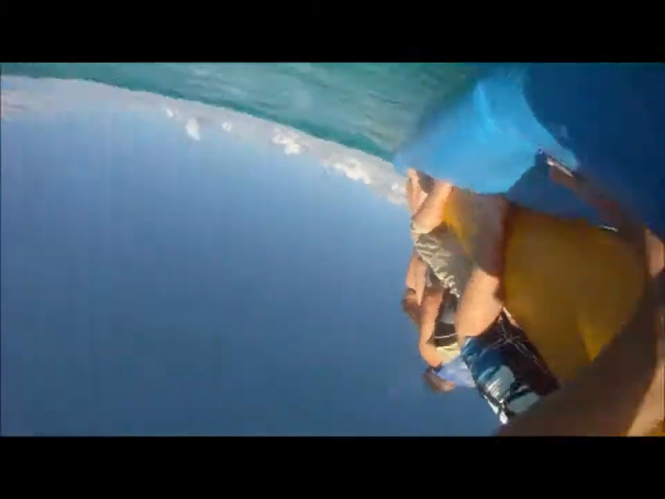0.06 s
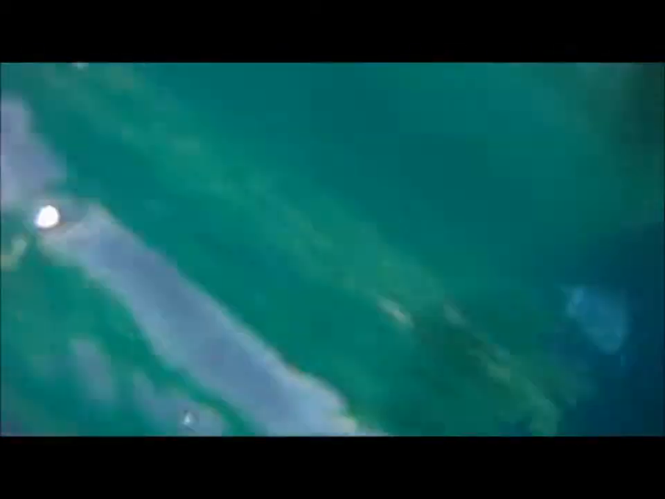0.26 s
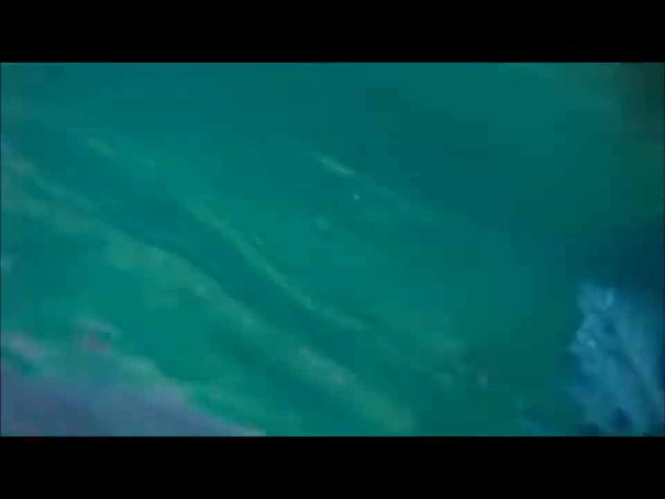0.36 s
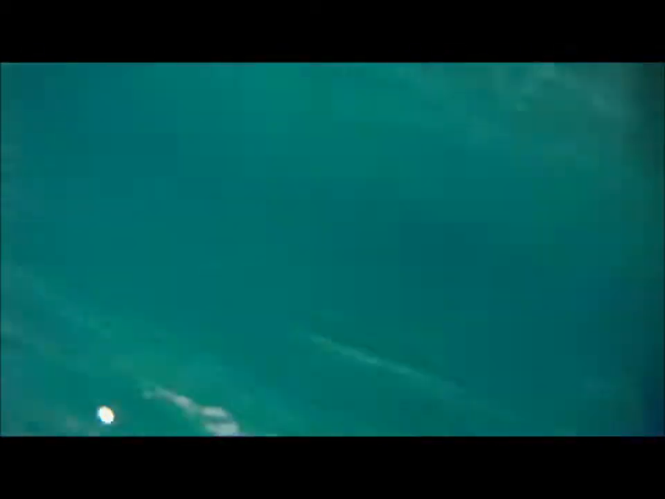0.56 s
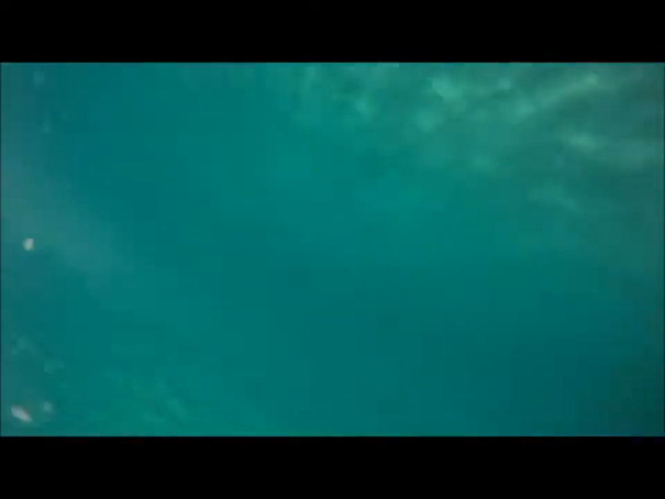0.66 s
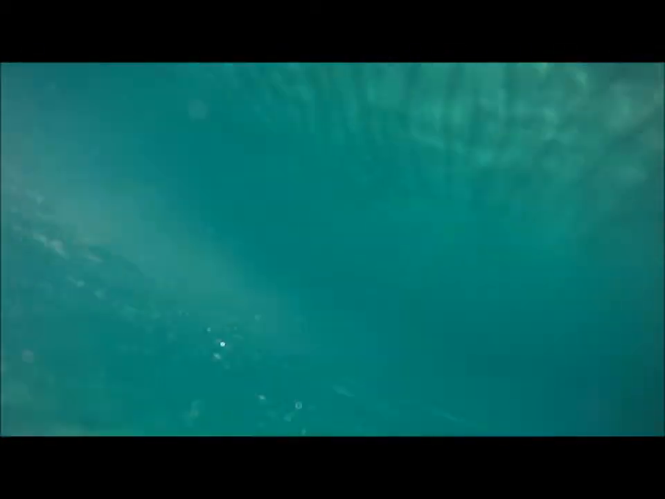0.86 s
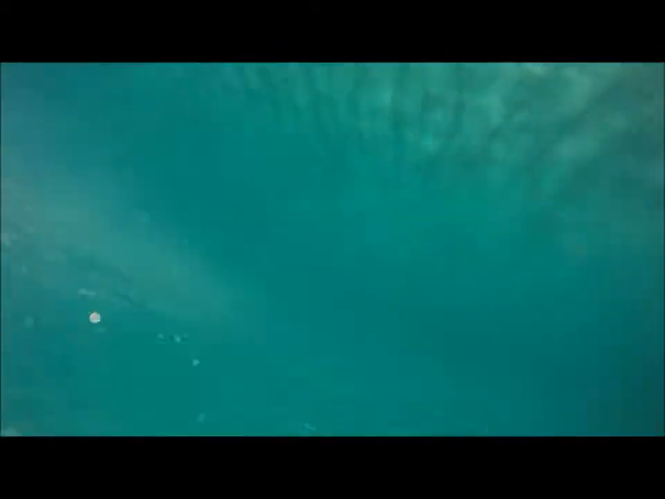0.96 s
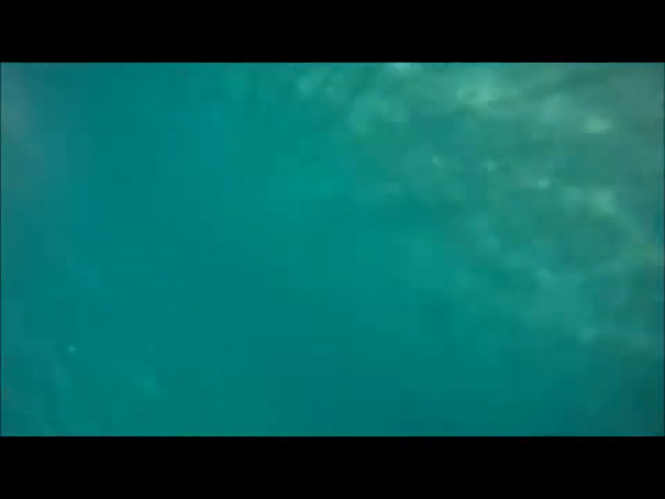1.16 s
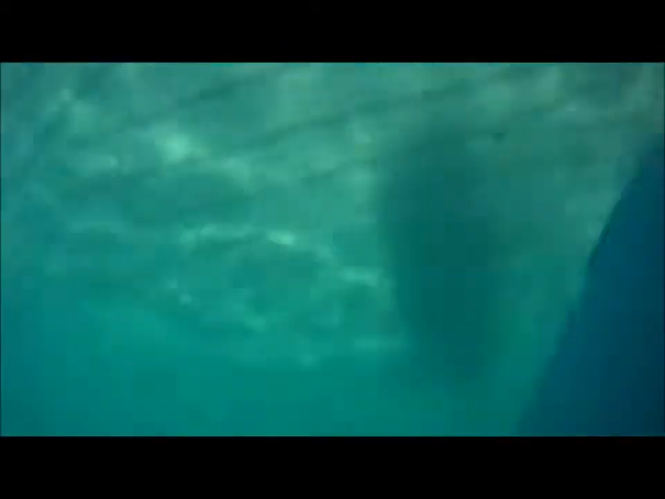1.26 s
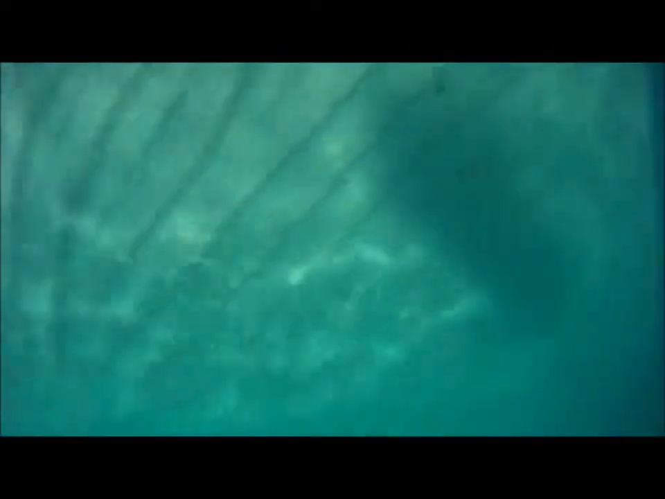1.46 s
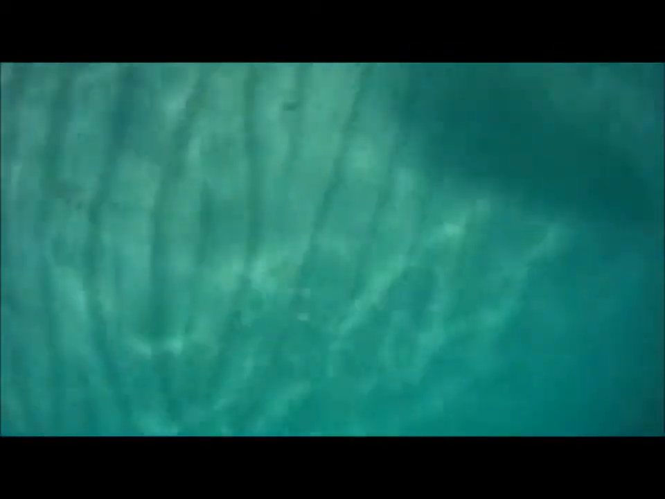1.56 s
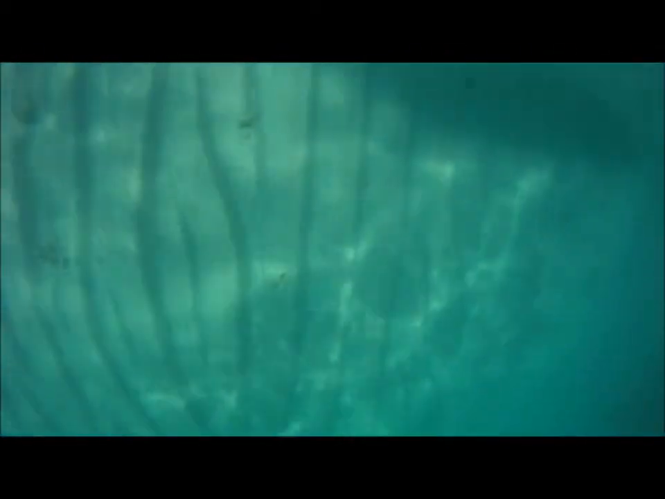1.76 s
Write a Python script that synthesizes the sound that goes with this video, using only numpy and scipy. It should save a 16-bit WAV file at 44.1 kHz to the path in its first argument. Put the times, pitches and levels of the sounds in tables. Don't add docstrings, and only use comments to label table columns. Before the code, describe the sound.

Water slaps and bubbles against a plastic camera housing going under, in a rapid cluster, then separate hard thuds and blips, fading gurgles and small drips over faint hiss; very close, coarse, briefly overloaded underwater microphone.

```python
import sys
import numpy as np
from scipy import signal
from scipy.fft import rfft, irfft, next_fast_len
from scipy.io import wavfile
from scipy.ndimage import uniform_filter1d, map_coordinates

SR = 44100
rng = np.random.default_rng(int(sys.argv[2]) if len(sys.argv) > 2 else 0)


def undo_db(level):
    steps = np.asarray(level, float) / 20
    return 10 ** steps


def wav_out(sig):
    wavfile.write(sys.argv[1], SR, np.round(np.clip(np.atleast_2d(sig).T, -1, 1) * 32767).astype(np.int16))


N = 79380

# f/Hz, level/dB (per Hz)
STILL_SPECTRUM = [(250, 0), (800, -12.5), (2200, -22), (5900, -27)]
# t/s (deepest point), depth/full scale, build-up/ms
PUSHES = [(0.032, 0.08, 14.2), (0.129, .045, 8.6), (.227, 0.017, 1.6), (0.234, 0.35, 0.97),
          (0.299, 0.035, 0.84), (0.3568, -0.079, 0.83), (0.5697, 0.047, 1.7), (0.6953, -0.42, 0.9),
          (0.7043, 0.1, 5), (0.7742, 1, 0.89), (0.8494, -0.34, 1.04), (0.8914, .06, 9.8),
          (1.041, -0.13, 3.1), (1.0555, 0.55, 1.35), (1.109, 0.28, 0.67), (1.156, 0.16, 7.2),
          (1.1687, 0.16, 7), (1.1783, 0.16, 5.5), (1.205, -0.067, 2.6), (1.2743, 0.12, 3.6),
          (1.298, 0.46, 2.8), (1.358, 0.87, 2.6), (1.476, 0.13, 1.6), (1.486, -0.15, 5.6),
          (1.519, 0.33, 0.36), (1.5873, .05, 0.47), (1.635, -0.029, 4.2)]
# t/s, level/dB
SWAY = [
    (0, -41),
    (.6, -39.5),
    (.9, -31),
    (1.3, -36.5),
    (1.6, -28.5),
    (1.8, -47),
]
# start t/s, end t/s, start level/dB, end level/dB
SURGES = [(0, .055, -37.5, -56), (.5, .55, -46, -45.5), (.04, .205, -72, -30.5), (.36, .4, -35, -37.5),
          (.24, .33, -35.5, -35.5), (.4, .445, -40, -25.5), (.46, .508, -38, -27.5), (.54, .6, -46, -47),
          (.63, .69, -39.5, -33), (.69, .706, -17, -6), (.705, .718, -24.5, -36.5), (.72, .77, -49, -55.5),
          (.85, .884, -36, -48.5), (.886, .955, -50.5, -31.5), (.955, .978, -39, -46.5),
          (.975, 1.05, -61, -50.5), (1.126, 1.209, -38.5, -39.5), (1.21, 1.265, -59.5, -58),
          (1.292, 1.4, -39, -59), (1.455, 1.475, -55, -46), (1.51, 1.65, -32.5, -56)]
# f/Hz, width/Hz, level/dB
FOAM_PEAKS = [(880, 334, 4), (2086, 460, 3.5), (3760, 650, -7), (5300, 620, -17)]
# start t/s, end t/s, level/dB, f/Hz
SEEPS = [
    (0.051, 0.14, -48.5, 3720),
    (0.1, 0.067, -51, 4500),
    (0.0587, 0.087, -48.5, 3040),
    (0.086, 0.14, -54.5, 4900),
    (0.094, 0.18, -56.5, 5500),
]
# start t/s, end t/s, start level/dB, end level/dB
SPRAY = [
    (.206, .228, -21.5, -20),
    (.805, .85, -44, -36),
    (1.265, 1.292, -52, -42.5),
    (1.475, 1.51, -37.5, -51.5),
]
# t/s, peak level/dB, f/Hz, fade time/ms (down
# about 130 dB), pitch glide/half the shift as a share of f per fade time
GLIDING_POCKETS = [(.2275, -25, 1275, 8, -0.47), (.234, -19, 3690, 20, -0.43), (.239, -12, 2055, 40, -.1),
                   (.251, -21, 3540, 12, -0.097), (.2575, -21.5, 3770, 12, -0.24), (.279, -22, 750, 43, -0.025),
                   (.2855, -20, 3380, 20, -0.19), (.2905, -16, 750, 11.4, 0.62), (.3075, -15, 1465, 36, -0.57),
                   (.314, -22, 1014, 44, 0.084), (.7732, -3, 1140, 8.2, 0.15), (.851, -37, 795, 72, -0.023),
                   (1.0537, -7, 880, 17.7, 0.11), (1.054, -26, 3680, 10, 0.31), (1.058, -19, 1310, 6.7, -0.19),
                   (.468, -21, 3550, 12, -0.063), (1.077, -28, 3200, 22, 0.13), (1.0775, -27.5, 2150, 17, .05),
                   (1.083, -41, 1300, 34, -0.11), (1.1078, -12.5, 750, 7.1, 0.68), (1.1115, -24, 770, 44, -0.059),
                   (1.3765, -34.5, 604, 14, .01), (1.134, -25, 1800, 22, 0.032), (1.4265, -22.5, 2200, 22, -0.0011),
                   (1.4385, -15, 2030, 25.4, 0.011), (1.489, -23, 2020, 16, -0.067), (1.4605, -28, 3740, 6.8, .01),
                   (1.461, -26.5, 800, 21, -0.18), (1.467, -30.5, 880, 28, 0.014), (1.472, -25, 403, 15, -0.22),
                   (1.645, -36, 2310, 30, -0.12), (1.648, -31.5, 3600, 10, -0.083), (1.657, -40, 1900, 45, 0.16),
                   (1.652, -43.5, 757, 40, -0.3), (1.733, -26.5, 1550, 14, -0.022), (1.734, -38, 1022, 85, 1.05),
                   (1.7415, -37.5, 3630, 15, .01), (1.7415, -34, 2300, 14, -0.24), (1.776, -45, 780, 32, -0.14)]
# t/s, peak level/dB, t60/ms, brightness level/dB
SLAPS = [(0.2278, 8, 14.7, 7.5), (0.238, -6, 35, -20), (0.275, -17, 42, -1), (0.298, -11.5, 21, 12.5),
         (0.308, -13, 22, 12.5), (0.3548, 6.5, 15.5, 8), (0.3907, -12, 11, 8.5), (.429, -11.5, 27, -8.5),
         (0.4433, -8.5, 46, 7.5), (0.4498, -5, 12, 28), (0.459, -5.5, 9.3, 14), (.5505, -14, 19, 21),
         (.563, -16, 39, 12.5), (0.5693, -13.5, 15, 15), (0.5987, -10.5, 43, 12), (0.6304, -11, 15, 14.5),
         (0.7015, 5, 7.3, 13.5), (0.7736, 1.5, 11.2, -9), (0.8475, -16, 31, 1.5), (1.0533, -4.5, 24.3, -22),
         (1.1075, -9, 25, -14), (1.127, -20.5, 40, -6.5), (1.2947, -26, 22, 16), (1.331, -24, 27, 6.5),
         (1.348, -10, 14.3, -4), (1.4265, -23, 6, 22.5)]
# t/s, peak level/dB, t60/ms
TAPS = [(0.341, -26.5, 57), (1.076, -29, 24), (1.179, -27, 36), (1.46, -25.5, 54), (1.528, -15, 16),
        (1.596, -29.5, 18), (1.648, -29.5, 25), (1.691, -41.5, 25), (1.7325, -27.5, 12), (1.742, -35, 18),
        (1.775, -37, 14)]
# f/Hz, width/Hz, level/dB
HOUSING_PEAKS = [(925, 570, 1.5), (1900, 720, 7), (3687, 283, -3.5), (5050, 500, -17.5)]
# t/s, peak level/dB, f/Hz, fade time/ms (down about 130 dB)
POCKETS = [(.2285, 0, 2307, 11), (0.2379, -5.5, 986, 23), (0.2778, -10.5, 2250, 22),
           (0.286, -12.5, 1830, 36), (0.3115, -12.5, 952, 31), (0.3555, -3, 1565, 17.5),
           (.3655, -16.5, 810, 49), (0.3902, 1, 1904, 15.5), (0.4503, 1.5, 1666, 17),
           (0.4575, -3.5, 2214, 14.4), (0.5165, -21.5, 551, 73), (.551, -13.5, 3720, 14),
           (0.57, -18, 1900, 15), (0.5992, -10, 2310, 23), (.6, -18.5, 750, 35), (.68, -17.5, 662, 137),
           (.7005, 1, 3590, 22), (.7015, -10.5, 1756, 15), (.552, -25, 2170, 22), (1.0535, -14, 638, 40),
           (1.3445, -12, 1314, 38.4), (.733, -31.5, 708, 170), (1.053, -3, 1900, 10.5),
           (1.076, -21.5, 1320, 25), (1.11, -16, 1840, 21), (1.345, -21.5, 694, 49), (1.348, -5, 2180, 30),
           (1.455, -13.5, 2020, 15.4), (1.643, -31, 1460, 77), (1.7331, -34, 1157, 18)]
# start t/s, end t/s, start level/dB, end level/dB
GURGLES = [
    (.255, .34, -42, -39),
    (.849, .875, -28, -39),
    (1.295, 1.31, -19, -70),
    (.886, .982, -30, -38.5),
    (1.452, 1.476, -40, -38),
    (1.5, 1.66, -35.5, -53.5),
]


def unit(x):
    return x / np.sqrt(np.mean(x ** 2) + 1e-20)


def wobble(rate):
    knots = rng.standard_normal(int(N * rate / SR) + 4)
    return map_coordinates(knots, [np.arange(N) * rate / SR])


def filtered(x, response):
    m = next_fast_len(N + SR // 2)
    return irfft(rfft(x, m) * response(np.fft.rfftfreq(m, 1 / SR)), m)[..., :N]


def resonances(rows, bright_db=0):
    def response(f):
        total = 0
        for k, (centre, width, db) in enumerate(rows):
            damping = 1j * f * width
            peak = damping / (centre * centre - f * f + damping)
            total = total + (-1) ** k * undo_db(db + bright_db * (k > 1)) * peak
        return total
    return response


def spans(rows):
    edge_ms = 3
    t = np.arange(N) / SR
    gain = np.zeros(N)
    for start, end, start_db, end_db in rows:
        opening = np.clip((t - start) * 1000 / edge_ms + .5, 0, 1)
        closing = np.clip((end - t) * 1000 / edge_ms + .5, 0, 1)
        gain += undo_db(np.interp(t, [start, end], [start_db, end_db])) * opening * closing
    return gain


def bump(ms, rise, fall):
    return np.exp(-(ms / np.where(ms < 0, rise, fall)) ** 2)


def churn(response):
    grains_per_s, grain_spread_db, grain_share = 2500, 2, .5
    patchy_db, flutter_db = 2.5, 2
    struck = rng.random(N) < grains_per_s / SR
    clicks = struck * rng.standard_normal(N) * undo_db(grain_spread_db * rng.exponential(size=N))
    water = grain_share * unit(clicks) + (1 - grain_share) * rng.standard_normal(N)
    z = signal.stft(water, nperseg=256)[2]
    patches = uniform_filter1d(rng.standard_normal(z.shape), size=4, axis=0)
    patches = uniform_filter1d(patches, size=3, axis=1)
    drive = signal.istft(z * undo_db(patchy_db * unit(patches)), nperseg=256)[1][:N]
    return unit(filtered(drive * undo_db(flutter_db * wobble(90)), response))


def still_water():
    f, db = np.transpose(STILL_SPECTRUM)
    hiss = filtered(rng.standard_normal(N), lambda hz: undo_db(np.interp(np.log(hz + 1), np.log(f), db)))
    return undo_db(-55.5 + 2 * wobble(20)) * unit(hiss)


def pressure():
    release_ms, slow_release = 1.7, 0.55
    rebound, rebound_after_ms, rebound_rise_ms, rebound_fall_ms = 0.27, 5.06, 3, 5.5
    sway_hz, membrane_hz, membrane_q = 67.4, 24.2, .65
    ms = np.arange(N) * 1000 / SR
    push = np.zeros(N)
    for s, depth, build in PUSHES:
        age = ms - s * 1000
        thrust = bump(age, build, max(release_ms, slow_release * build))
        spring_back = rebound * bump(age - rebound_after_ms, rebound_rise_ms, rebound_fall_ms)
        push += depth * (spring_back - thrust)
    sway = unit(filtered(rng.standard_normal(N), lambda f: 1 / (1 + (f / sway_hz) ** 2) ** 2))
    sway = undo_db(np.interp(ms / 1000, *np.transpose(SWAY))) * sway
    vent = lambda f: -f * f / (membrane_hz ** 2 - f * f + 1j * f * membrane_hz / membrane_q)
    return filtered(push + sway, vent)


def foam():
    low_cut_hz = 580
    body = resonances(FOAM_PEAKS)
    return spans(SURGES) * churn(lambda f: body(f) * (1j * f / (low_cut_hz + 1j * f)) ** 2)


def seep():
    t = np.arange(N) / SR
    out = np.zeros(N)
    for start, end, db, hz in SEEPS:
        gap = resonances([(hz, 220, 0)])
        swell = np.sin(np.pi * np.clip((t - start) / (end - start), 0, 1))
        out += undo_db(db) * swell * churn(lambda f: gap(f) ** 2)
    return out


def spray():
    body = resonances(FOAM_PEAKS[1:])
    return spans(SPRAY) * churn(lambda f: body(f) * 1j * f / (1200 + 1j * f))


def ringing_air(rows):
    fade_db, sag_db, swell_ms = 62, 67.5, 0.71
    warble_rad, neighbour_db = .5, -9
    out, t = np.zeros(N + SR), np.arange(SR // 5) / SR
    for s, db, hz, t60, glide in rows:
        detune, turn = rng.random(2)
        age = t * 1000 / t60
        shape = undo_db(-fade_db * age - sag_db * age ** 2) * (1 - np.exp(-t * 1000 / swell_ms)) ** 2
        phase = 2 * np.pi * hz * t * (1 + glide * np.minimum(age, 2))
        phase = phase + warble_rad * np.sin(2 * np.pi * (3 * age + turn))
        neighbour = undo_db(neighbour_db) * np.sin(phase * (.82 + .1 * detune))
        out[round(s * SR):][:len(t)] -= undo_db(db) * shape / shape.max() * (np.sin(phase) + neighbour)
    return out[:N]


def gliding_pockets():
    return ringing_air(GLIDING_POCKETS)


def slaps():
    decay_curve = 0.91
    out, n = np.zeros(N + SR), SR // 10
    t, hz = np.arange(n) / SR, np.fft.rfftfreq(2 * n, 1 / SR)
    for s, db, t60, bright_db in [*SLAPS, *[(*tap, 0) for tap in TAPS]]:
        burst = rng.standard_normal(n) * undo_db(-60 * (t * 1000 / t60) ** decay_curve)
        housing = resonances(HOUSING_PEAKS, bright_db)(hz)
        hit = irfft(rfft(burst, 2 * n) * housing)[:n]
        out[round(s * SR):][:n] += undo_db(db) * hit / np.abs(hit).max()
    return out[:N]


def pockets():
    pitch_rise = 0.016
    return ringing_air([(*row, pitch_rise) for row in POCKETS])


def gurgles():
    cavity = resonances([(750, 500, 0)])
    return spans(GURGLES) * churn(lambda f: cavity(f) ** 2)


def scene():
    mono = still_water() + pressure() + foam() + seep() + spray()
    mono = mono + gliding_pockets() + slaps() + pockets() + gurgles()
    return np.array([mono, mono])


def low_pass(x):
    return signal.sosfilt(signal.butter(12, 15820, fs=SR, output="sos"), x)


def record(dry):
    overload, hardness, top_hz, side_db = 1.05, 8, 15500, -36.5
    coarse = signal.resample_poly(dry[0], 40, 147)
    coarse = coarse / (1 + np.abs(coarse / overload) ** hardness) ** (1 / hardness)
    held = signal.resample_poly(np.repeat(coarse, 4)[2:], 147, 160)
    held = filtered(held, lambda hz: 1 / (1 + (hz / top_hz) ** 60))
    side = undo_db(side_db) * held * wobble(1500)
    mix = np.clip([held + side, held - side], -1, 1)
    return low_pass(mix)


dry = scene()
out = record(dry)
wav_out(out)
```